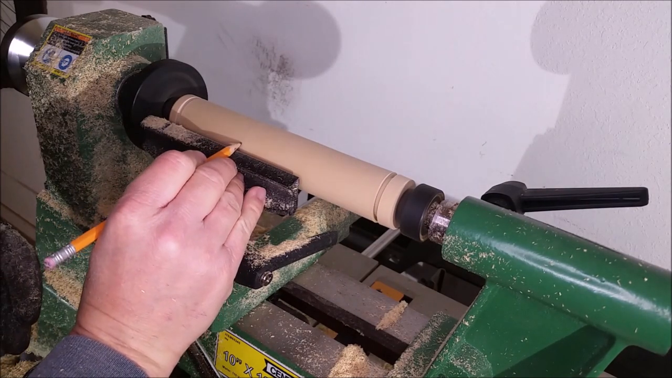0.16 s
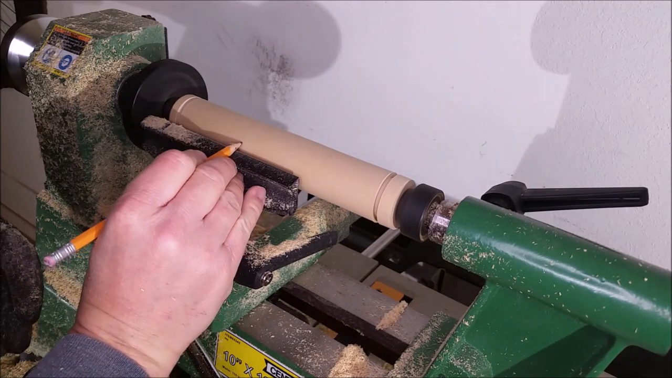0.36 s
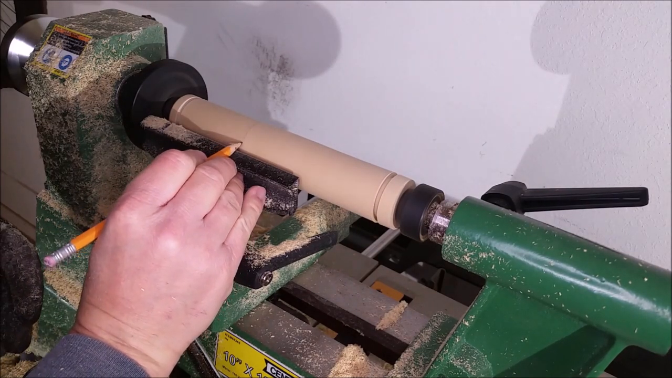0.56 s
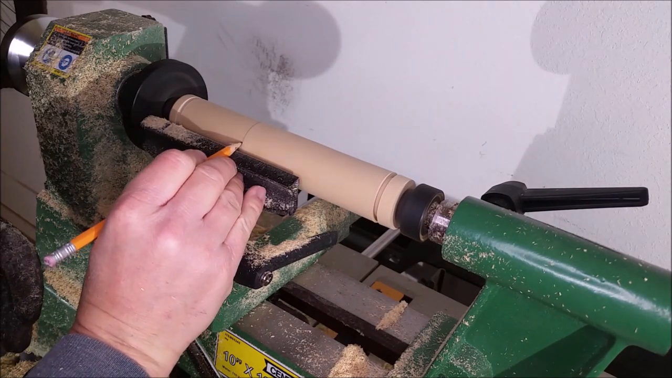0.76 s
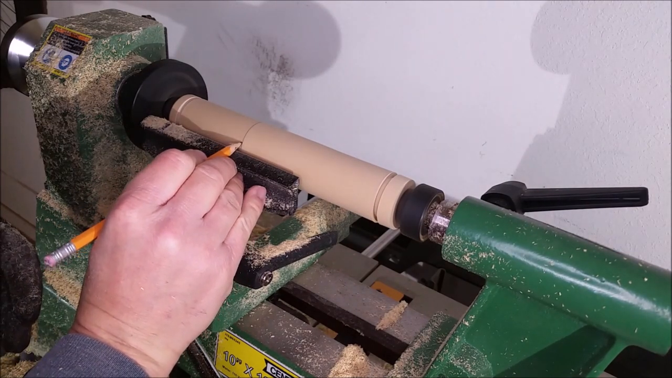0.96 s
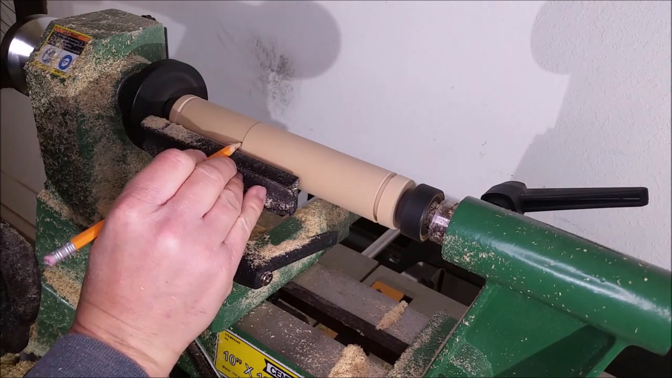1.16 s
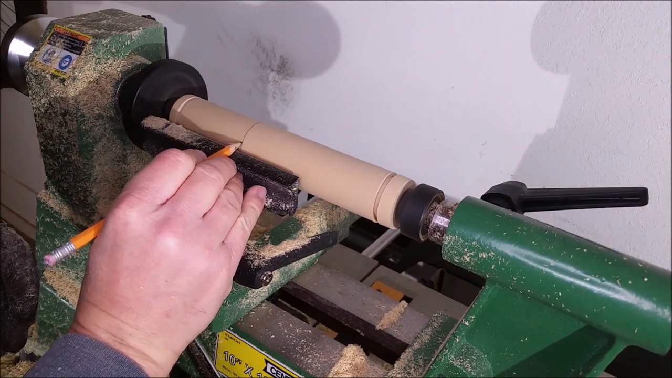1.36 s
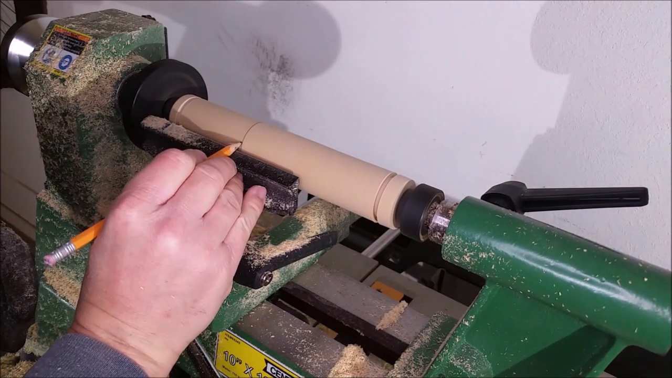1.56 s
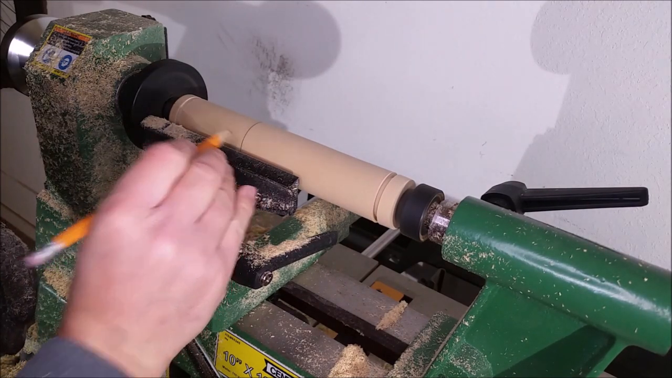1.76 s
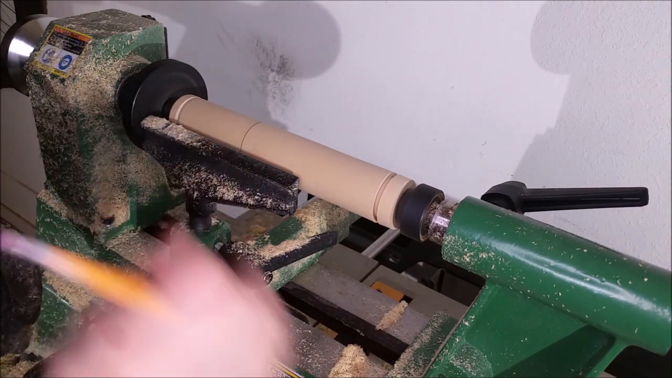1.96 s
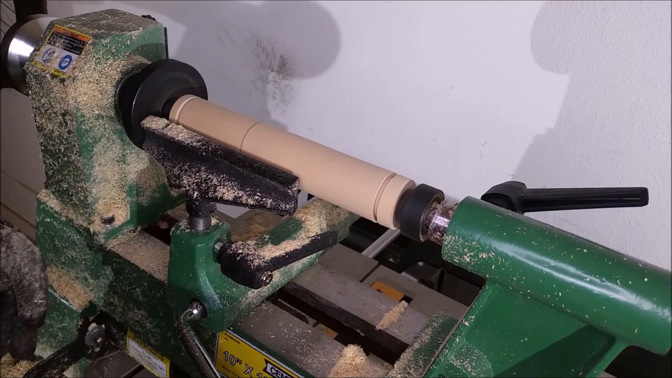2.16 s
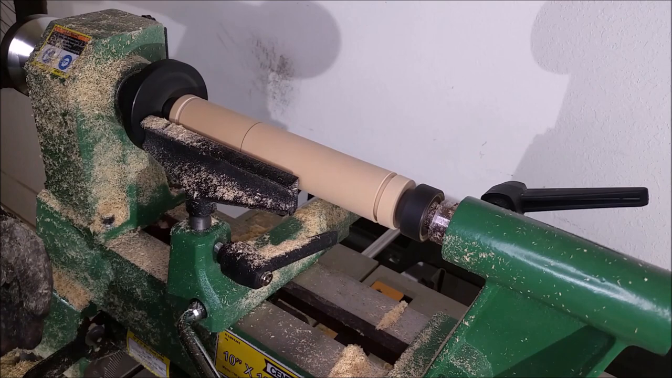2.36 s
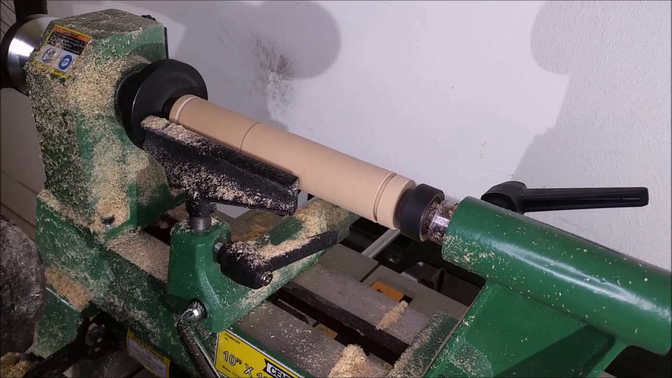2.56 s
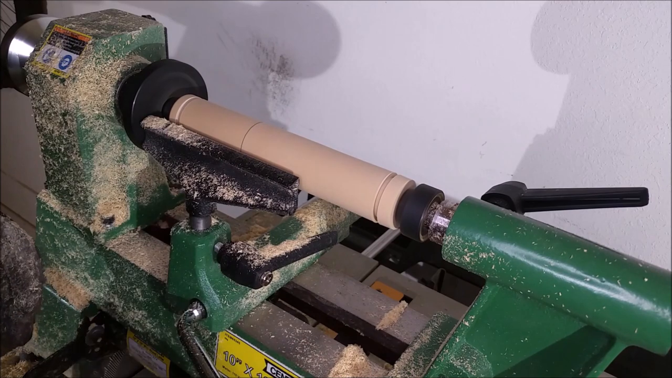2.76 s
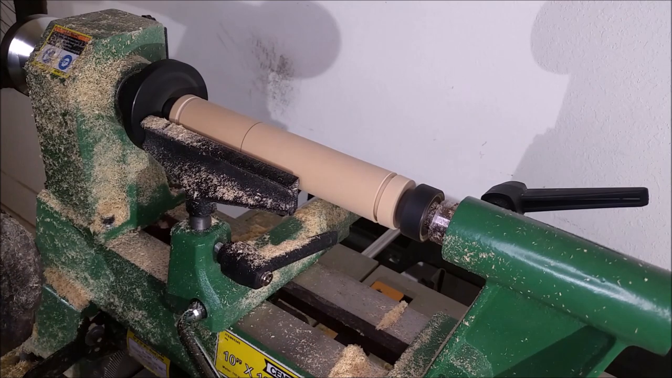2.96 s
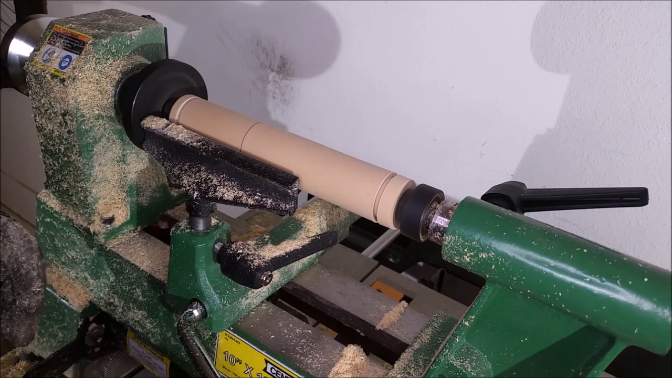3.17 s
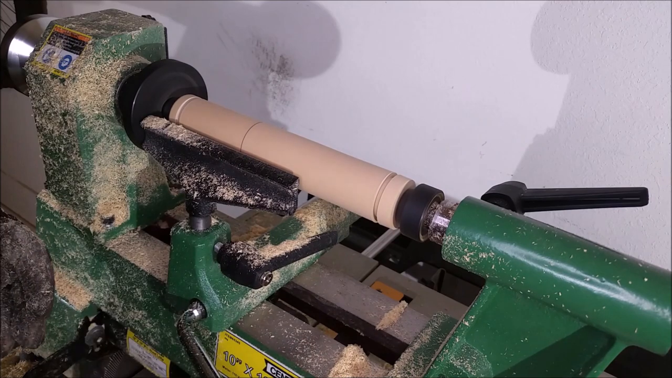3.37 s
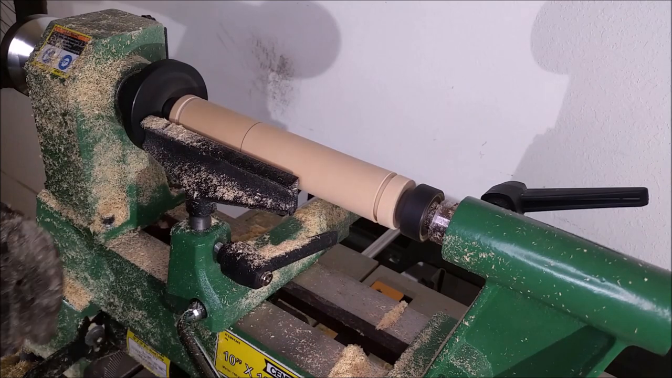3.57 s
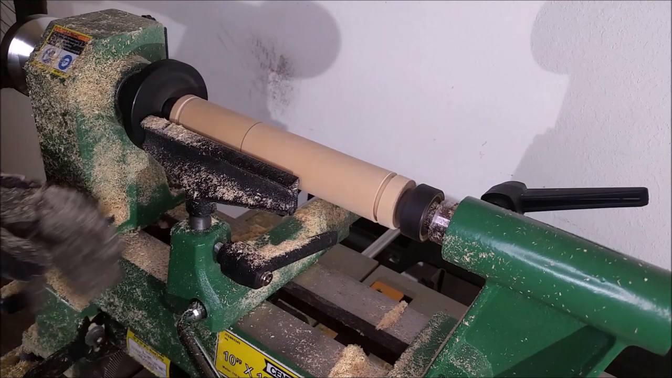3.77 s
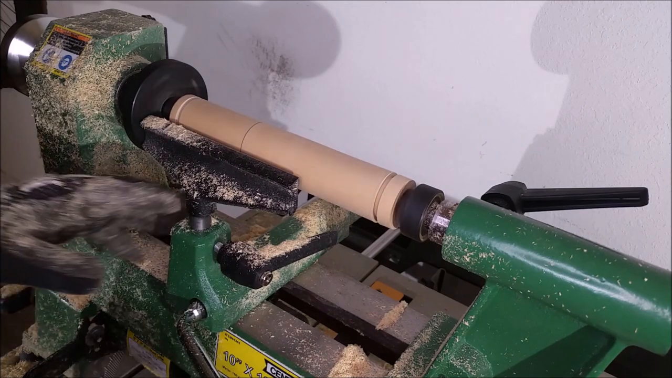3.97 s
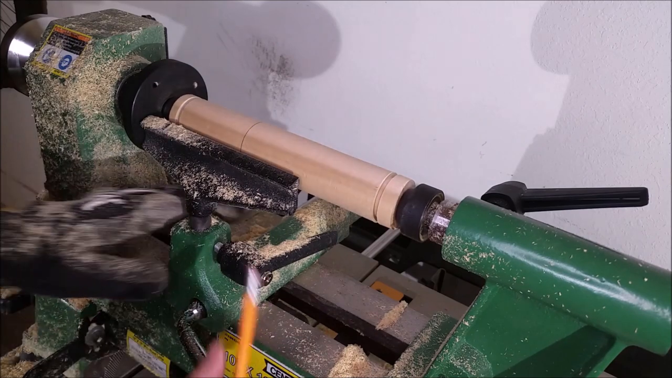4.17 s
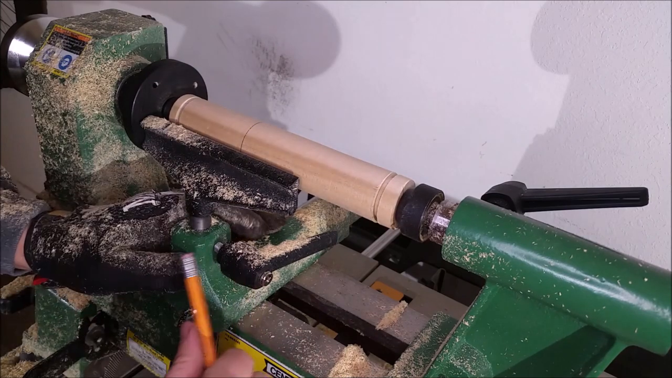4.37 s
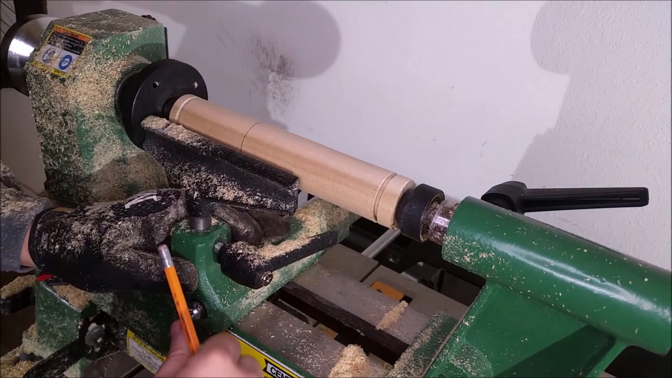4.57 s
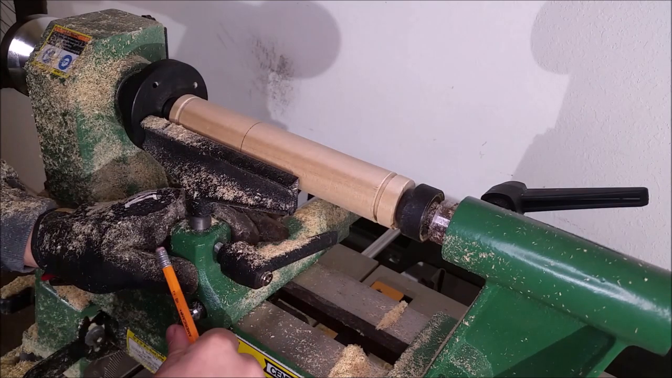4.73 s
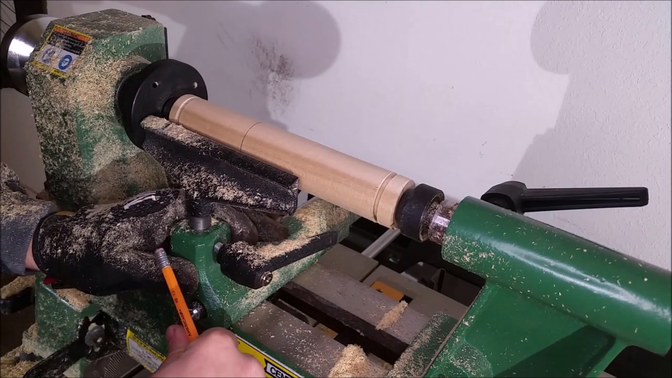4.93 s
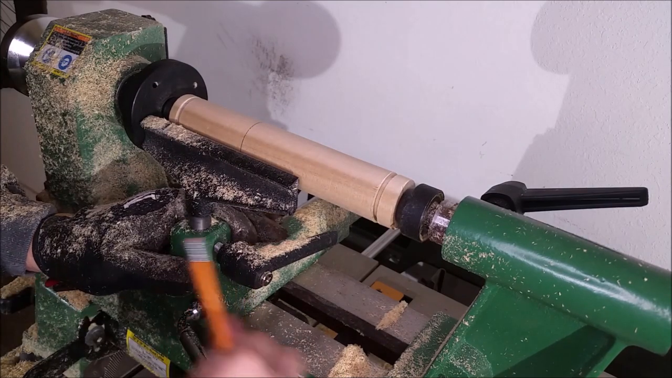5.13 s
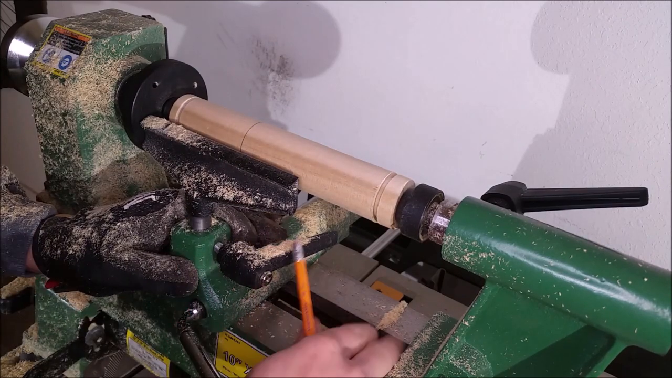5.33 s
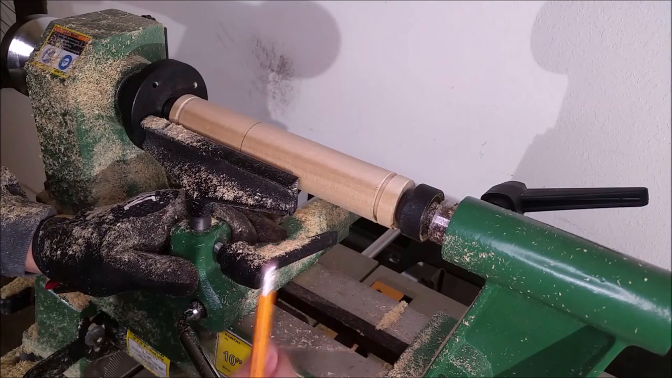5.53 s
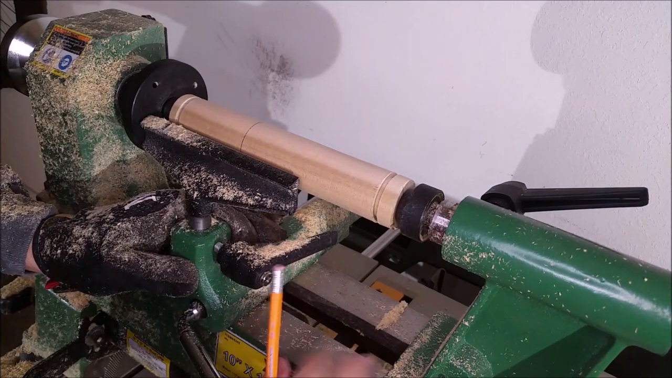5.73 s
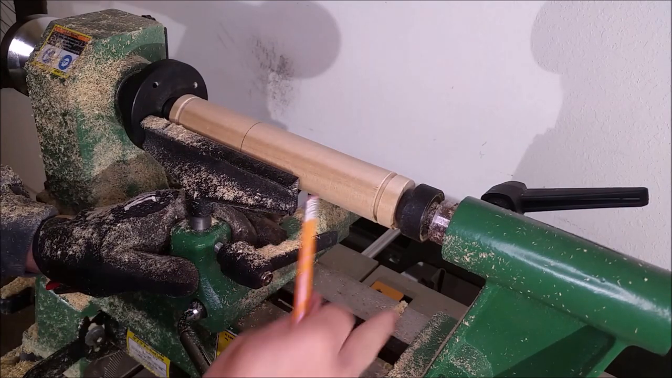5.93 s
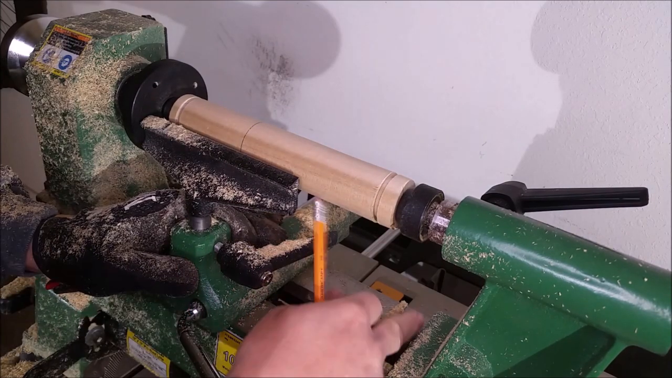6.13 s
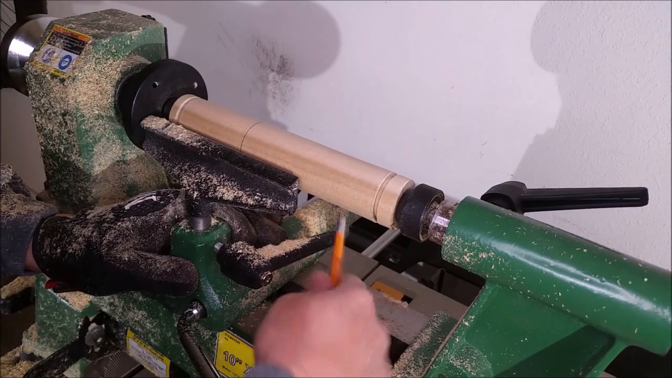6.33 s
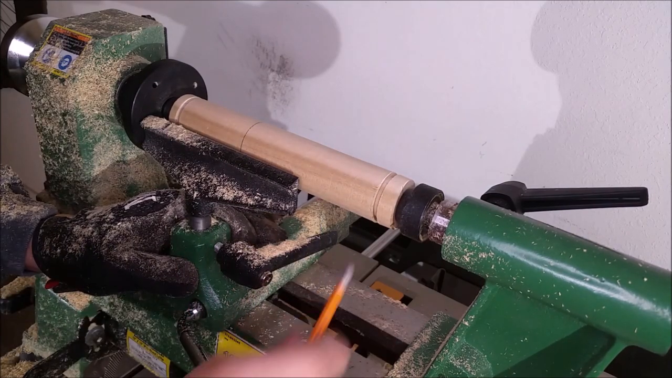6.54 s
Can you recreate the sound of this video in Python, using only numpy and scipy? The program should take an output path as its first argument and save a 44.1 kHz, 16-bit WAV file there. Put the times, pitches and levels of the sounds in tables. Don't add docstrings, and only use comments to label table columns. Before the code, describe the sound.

A small lathe hums steadily while a pencil scratches and squeals on spinning wood, then the switch snaps and it coasts down to soft glove rustles and knocks.

```python
import sys
import numpy as np
from scipy import signal
from scipy.fft import rfft, irfft, next_fast_len
from scipy.io import wavfile
from scipy.ndimage import uniform_filter1d, map_coordinates

SR = 44100
rng = np.random.default_rng(int(sys.argv[2]) if len(sys.argv) > 2 else 0)


def transcribe(signal):
    frames = np.atleast_2d(signal).T
    limited = np.clip(frames, -1, 1)
    pcm = np.round(limited * 32767).astype(np.int16)
    wavfile.write(sys.argv[1], SR, pcm)


def decibels_to_gain(level_db):
    exponent = np.asarray(level_db, float) / 20
    return 10 ** exponent


N = 291060

TURN_HZ = 39.66
OFF_S, DRAG_S, STOP_S = 2.9474, 2.971, 4.282


def clock():
    return np.arange(N) / SR


def unit(x):
    return x / np.sqrt(np.mean(x ** 2) + 1e-20)


def along(points, hz):
    f, v = np.transpose(points)
    return np.interp(np.log(hz + 1), np.log(f + 1), v)


def wobble(rate_hz):
    steps = np.arange(0, N * rate_hz / SR + 1, 1 / 8)
    smooth = map_coordinates(rng.standard_normal(int(steps[-1]) + 4), [steps])
    return np.interp(clock() * rate_hz, steps, smooth)


def filtered(x, response):
    m = next_fast_len(N + SR // 2)
    return irfft(rfft(x, m) * response(np.fft.rfftfreq(m, 1 / SR)), m)[..., :N]


def coloured(x, spectrum):
    return unit(filtered(x, lambda hz: decibels_to_gain(along(spectrum, hz))))


def resonant(peaks, hz):
    total = 0
    for k, (centre, width, db) in enumerate(peaks):
        mode = 1j * hz * width / (centre * centre - hz * hz + 1j * hz * width)
        total = total + (-1) ** k * decibels_to_gain(db) * mode
    return total


def tones(lines, drift, swell_db):
    total = 0
    for hz, db in lines:
        size = np.sqrt(2) * decibels_to_gain(db + swell_db * wobble(8.69))
        phase = 2 * np.pi * hz * clock() + drift * wobble(7) + 7 * rng.random()
        total = total + size * np.sin(phase)
    return total


def swells(rows, rise=1):
    s, db, width = np.transpose(rows)[:, :, None]
    t = clock()[::32]
    offset = np.abs((t - s) / np.where(t < s, rise * width, width))
    return np.interp(clock(), t, decibels_to_gain(db - 10 * offset ** 1.4).sum(axis=0))


def surface(memory, bumps_db, fresh):
    turn = clock() * TURN_HZ
    shape = (int(turn[-1]) + 2, round(SR / TURN_HZ))

    def wear():
        return uniform_filter1d(rng.standard_normal(shape), max(round(memory), 1), axis=0)

    bumps = unit(uniform_filter1d(wear(), size=28, axis=1, mode="wrap"))
    grain = (unit(wear()) + fresh * rng.standard_normal(shape)) * decibels_to_gain(bumps_db * bumps)
    return grain[turn.astype(int), (turn % 1 * shape[1]).astype(int)]


def walls(x, t60_s):
    t = np.arange(SR // 2) / SR
    tail = rng.standard_normal(SR // 2) * decibels_to_gain(-60 * t / t60_s)
    return signal.fftconvolve(x, tail / np.linalg.norm(tail))[:N]


# [f/Hz, level/dB per Hz]
RUMBLE = [(12, -53.5), (20, -6.5), (70, 0.5), (128, -8.5), (145, -7), (265, -16), (367, -19.5), (414, -35),
          (608, -25), (686, -27), (759, -14), (807, -34.5), (2500, -43), (3250, -69.5), (5500, -120)]
MIC_HISS = [(880, -42), (1500, -12), (1790, -1.5), (2190, -6.5), (5280, -10.5), (9370, -16), (14800, -7),
            (16000, -17)]
# [f/Hz, level/dB rms]
APPLIANCES = [(59.2, -62.5), (80.7, -61.5), (118.4, -62), (597.5, -75), (624.5, -73), (742.9, -57),
              (1217, -80.5)]


def workshop():
    rumble = coloured(rng.standard_normal(N), RUMBLE)
    hiss = coloured(rng.standard_normal(N), MIC_HISS)
    return decibels_to_gain(-54.5) * rumble + decibels_to_gain(-68.5) * hiss + tones(APPLIANCES, drift=.2, swell_db=0.9)


# [f/Hz, level/dB per Hz]
FABRIC = [(900, -42.5), (1800, -8.5), (3000, -5.5), (4500, -5.5), (6000, -6), (7500, -11.5), (9100, -12),
          (12400, -3.5), (14500, -9.5), (16000, -8)]
SCUFF_NOISE = [(88, -31.5), (150, -2.5), (568, -7.5), (753, -12.5), (792, -8.5), (1050, -11), (1240, -9.5),
               (8000, -28), (10400, -75.5), (17600, -120)]
# [t/s, level/dB, half-width/s]
RUSTLES = [(2.22, -56, .12), (2.45, -55, .1), (2.7, -55, .15), (3.2, -60.5, .3), (3.71, -67.5, .06),
           (3.96, -68.5, .15), (4.2, -67.5, .04), (4.42, -61, .07), (4.66, -64.5, .15), (5.565, -56, 0.04),
           (5.77, -59.5, 0.0126), (5.84, -53.5, 0.041), (5.975, -67.5, .015), (6.03, -64, 0.011),
           (6.07, -56.5, 0.0093), (6.237, -61.5, .012), (6.15, -69, .2), (6.33, -63, 0.05),
           (6.42, -48, 0.038), (6.533, -52.5, .02), (6.59, -63.5, .04)]
SCUFFS = [(5.985, -71, 0.025), (4.0, -58, 0.406), (4.63, -56.5, 0.23), (5.25, -67.5, 0.57),
          (5.57, -66, 0.098), (5.85, -67, 0.09), (6.05, -56, 0.027), (6.2, -52, 0.23), (6.5, -50, 0.11)]


def gloves():
    steel = [(1100, 75, -5.5), (1920, 150, -6.5), (2338, 130, 9.0),  # f/Hz, width/Hz, level/dB
             (2970, 140, -6.0), (3607, 200, 8.0), (4613, 150, -0.5)]
    fibres = rng.standard_normal(N) * decibels_to_gain(2.2 * wobble(400))
    rustle = coloured(fibres, FABRIC)
    scuff = coloured(rng.standard_normal(N) * decibels_to_gain(0.77 * wobble(40)), SCUFF_NOISE)
    scuff = unit(filtered(scuff, lambda hz: 5.4 + resonant(steel, hz)))
    return swells(RUSTLES) * decibels_to_gain(3.5) * rustle + swells(SCUFFS) * decibels_to_gain(1.5) * scuff


# [f/Hz, level/dB, t60/s]
REST = [(494, -15.5, .2), (657, 1, .14), (689, -2, .17), (1090, -12, .09), (1163, -14, .08),
        (1840, -21, .15)]
# contacts [t/s, peak/dB, tool rest ring/dB, crack/dB]; modes struck [f/Hz, level/dB, t60/s]; band top/Hz
SWITCH = [(2.9474, -7.5, -14, 0)], [(1300, -5, .008), (3510, 2, 0.013), (4600, -4.5, .008),
          (6100, -5, 0.011), (13640, -3, .0073)], 24000
LEVER = [(4.4968, -43, -3, -24), (4.518, -41.5, -11, -24), (4.567, -53, -20, -33)], [(1430, -2.5, 0.18),
         (1770, 1, .12), (3300, -8.5, 0.079)], 4000
FERRULE = [(5.9749, -26.5, -41, -9.5)], [(3500, -9, .0015), (7000, -3, .0015)], 14000
CLAMP = [(6.028, -25.5, -31, -18), (6.042, -32.5, -14, -15)], [(356, -2.5, 0.015), (800, -1, 0.01),
         (2208, -9, 0.028), (3490, -12, 0.1), (4330, -7.5, 0.054)], 4500
POST = ([(6.0631, -26.5, -9, -8.5), (6.0685, -40, 15, -20), (6.46, -40.5, -23, -30)], [(1140, 0.5, 0.041),
        (3000, 0.5, 0.017), (1840, -2.5, 0.027)], 9300)
NUDGE = [(6.229, -39, -2, -25), (6.242, -34, -6, -22), (6.252, -48, 3, -27)], [(1150, 4, 0.028),
         (3560, -19, 0.27)], 5000
TAP = [(6.4247, -29, -31, -8), (6.4315, -33, -31, -20)], [(3050, 0, .022)], 9000


def struck(noise, hz, level_db, t60_s, t):
    clack = decibels_to_gain(-2.0) * (1 - 7 * hz * t) * np.exp(-7 * hz * t)
    band = signal.butter(2, [.92 * hz, 1.09 * hz], "band", fs=SR, output="sos")
    rough = unit(signal.sosfilt(band, noise))
    ring = 0.49 * np.sin(2 * np.pi * hz * t) + 0.61 * rough
    return decibels_to_gain(level_db) * (clack + decibels_to_gain(-60 * t / t60_s) * ring)


def rest_ring(jitter, t):
    total = 0
    for k, (hz, db, t60_s) in enumerate(REST):
        decay = decibels_to_gain(db + 1.2 * jitter[k] - 60 * t / t60_s)
        total = total + decay * (-1) ** k * np.sin(2 * np.pi * hz * t)
    return (1 - np.exp(-t / 0.0027)) ** 3 * total


def knocks():
    out, t = np.zeros(N + SR), np.arange(SR // 3) / SR
    for contacts, modes, top_hz in (SWITCH, LEVER, FERRULE, CLAMP, POST, NUDGE, TAP):
        lowpass = signal.butter(2, min(top_hz, .45 * SR), fs=SR, output="sos")
        for s, db, rest_db, crack_db in contacts:
            noise = rng.standard_normal((3, len(t)))
            sound = decibels_to_gain(crack_db - 60 * t / 0.0073) * (noise[0] - 0.19 * np.roll(noise[0], 2))
            for hz, level_db, t60_s in modes:
                sound = sound + struck(noise[1], hz, level_db, t60_s, t)
            sound = signal.sosfilt(lowpass, sound)
            hit = decibels_to_gain(db) * (sound + decibels_to_gain(rest_db) * rest_ring(noise[2], t))
            out[round(s * SR):][:len(t)] += hit
    return out[:N]


# [t/s, level/dB, time to rise 10 dB/s, t60/s, f/Hz]
SQUEAKS = [(.1, -40, .07, .7, 4500), (.2, -44, .03, .3, 4490), (2.24, -52, .1, .6, 6280),
           (2.28, -48, .08, .4, 4470)]


def squeak(hiss):
    t, total = clock(), 0
    for s, db, rise_s, t60_s, hz in SQUEAKS:
        gain = decibels_to_gain(db + np.where(t < s, 10 * (t - s) / rise_s, -60 * (t - s) / t60_s))
        total = total + gain * (tones([(hz, 1.5)], drift=3.6, swell_db=5.0) + decibels_to_gain(-0.5) * hiss)
    return total


# [f/Hz, level/dB per Hz]
DRAG = [(35, -55.5), (60, -26), (139, -7.5), (172, -16), (408, -6.5), (666, -8.5), (1380, -6.5),
        (1580, -5.5), (2520, -13.5), (4030, -12.5), (16000, -25.5)]
# [f/Hz, width/Hz, level/dB]
BED = [(272, 6.7, -22), (420, 22, -3.5), (678.6, 38, 4.5), (1070, 110, 6), (1270, 60, -8.5),
       (1588, 36, 0.5), (1843, 140, -7.5), (2270, 45, 4), (2750, 13, -15), (2930, 65, 3.5)]
# [f/Hz, level/dB, t60/s]
GRAB = [(600, -18, 0.95), (1808, -19, 1.62), (4200, -16.5, 0.62), (9946, -21.5, .45)]
# [t/s,
# level/dB, half-width/s]
UPPER_SWEEPS = [(3.0, -35, .08), (3.15, -28.5, 0.11), (3.4, -32.5, 0.15), (3.55, -39, 0.081),
                (3.68, -37.5, 0.17), (3.86, -43, 0.082), (4.0, -58, 0.064)]
LOWER_SWEEPS = [(.2, -43, 0.21), (2.3, -37, 0.12), (3.05, -43, 0.062), (3.17, -48.5, 0.11),
                (3.49, -49, 0.098), (3.77, -51, 0.11), (3.96, -45.5, 0.085), (4.19, -57.5, .04),
                (4.28, -61, .04)]


def coasting():
    rub = rng.standard_normal(N) * decibels_to_gain(.7 * wobble(35) + .9 * wobble(150))
    rub = unit(filtered(rub, lambda hz: decibels_to_gain(along(DRAG, hz)) * (0.41 + resonant(BED, hz))))
    hz, t, z = signal.stft(rub, SR, nperseg=128)
    hz, since = hz[:, None], t - DRAG_S
    speed = np.clip(1 - since / (STOP_S - DRAG_S), 1e-4, 1)
    over = hz / (3890 * speed ** 1.4)
    shelf = decibels_to_gain(2 * -11.5) / (1 + over ** 2)
    steady = decibels_to_gain(-31.5) * speed ** 0.41 * np.sqrt(1 / (1 + over ** 5.5) + shelf)
    grab_db, t60_s = (along(np.array(GRAB)[:, [0, k]], hz) for k in (1, 2))
    grab = decibels_to_gain(grab_db - 60 * np.abs(since) / t60_s)
    gain = np.clip(since / 0.0064, 0, 1) * np.hypot(steady, grab)
    rub = signal.istft(z * gain, SR, nperseg=128)[1][:N]
    upper_tones = tones([(442, -14.0), (660, -1.0), (682, -8.0)], drift=2.5, swell_db=-2.5)
    upper = swells(UPPER_SWEEPS, rise=0.22) * upper_tones
    lower = swells(LOWER_SWEEPS, rise=.8) * tones([(256, 0)], drift=.6, swell_db=.4)
    return rub + (clock() > OFF_S) * upper + lower


# [t/s, level/dB]
PRESSURE = [(.455, -34), (.48, 0), (.525, -5), (.6, -2.5), (.75, -.5), (1.6, 0), (1.765, -2), (1.8, 0),
            (1.815, -16), (1.9, -30)]


def pressure():
    s, db = np.transpose(PRESSURE)
    return decibels_to_gain(np.interp(clock(), s, db, -120, -120))


def vibrating(full_db, short_db, recover_s, linger_s):
    dip_s = 0.62
    held = filtered(pressure(), lambda hz: 1 / (1 + 2j * np.pi * hz * linger_s))
    return held * decibels_to_gain(full_db - short_db * np.exp(-np.abs((clock() - dip_s) / recover_s) ** 0.56))


# [f/Hz, level/dB per Hz]
SCRATCH = [(2000, -30), (2800, -2), (3900, -24), (5200, -18.5), (7000, -21.5), (8500, -16.5), (9500, -16),
           (10700, -8.5), (11150, -17), (12200, -1.5), (13600, -10.5), (14100, -11.5), (14400, -23),
           (15200, -21.5), (15600, -17.5), (16000, -20.5)]
# [f/Hz, width/Hz, level/dB]
SHAFT = [(3425, 31, -5), (4230, 120, -10.5), (4600, 40, -7.5), (5570, 19, -11.5), (5600, 58, -12),
         (6230, 25, -4.5), (8540, 24, -11.5), (10960, 48, -5.5), (10720, 120, -16), (11200, 43, -13),
         (11900, 30, -21.5), (12650, 37, -7), (13750, 150, -13.5), (15520, 90, -13)]
BLANK = [(603, 30, 1), (1150, 200, -6), (1452, 72, -4), (1697, 350, 1.5), (2040, 110, 4), (2080, 89, 1),
         (2344, 60, -1.5), (2793, 46, -1.5), (3200, 240, -9.5)]
# [f/Hz, level/dB rms]
SINGING = [(1071, -31.5), (1109, -30.5), (1233, -38.5), (1276, -40), (1357, -46), (1507, -39),
           (1547, -42.5), (1626, -35.5), (1666, -40), (1705.4, -31), (1745, -33.5), (1784.7, -39.5),
           (1903.7, -25), (1943.3, -29.5), (2022.7, -34.5), (2045, -34.5), (2062.3, -36.5), (2126, -39.5),
           (2229, -36.5), (2299, -41.5), (2379, -38), (2627, -47.5), (2767, -30.5), (2859, -37.5)]
SQUEALS = [(4107, -43), (5362, -60), (10912, -60), (11337, -58), (11499, -45.5), (11892, -48),
           (12252, -41.5)]
WHISTLE = [(4630, -38.5), (4657, -45), (6245, -40.5), (6262, -47)]
# [f/Hz, level/dB rms, place in turn 0-1]
CHIRPS = [(1824.4, -32, .48), (4710, -35, .48), (12210, -42, .19)]


def high_spot(place):
    angle = 2 * np.pi * (TURN_HZ * clock() - place) + .12 * wobble(6)
    return unit(np.exp(2.6 * np.cos(angle)))


def pencil():
    scratch = coloured(surface(memory=14, bumps_db=3.5, fresh=1.0), SCRATCH)
    ring = unit(filtered(surface(memory=14, bumps_db=4.5, fresh=.3), lambda hz: resonant(SHAFT, hz)))
    runout = 1 + .9 * np.sin(2 * np.pi * TURN_HZ * clock() + 0.25 * wobble(2.7))
    squeal = decibels_to_gain(27.5) * runout * tones(SQUEALS, drift=1.0, swell_db=0.5)
    lead = tones(WHISTLE, drift=1.6, swell_db=1.9)
    for hz, db, place in CHIRPS:
        lead = lead + high_spot(place) * tones([(hz, db)], drift=.7, swell_db=.6)
    hum = surface(memory=34, bumps_db=3.0, fresh=0.76)
    hum = unit(filtered(hum, lambda hz: np.abs(resonant(BLANK, hz)) ** 1.2))
    song = decibels_to_gain(17.5) * tones(SINGING, drift=.55, swell_db=.6)
    ring_gain = vibrating(full_db=-27, short_db=14, recover_s=0.039, linger_s=.005)
    lead_gain = vibrating(full_db=1, short_db=11.5, recover_s=0.15, linger_s=.025)
    hum_gain = vibrating(full_db=-21, short_db=21.5, recover_s=0.03, linger_s=0.08)
    return (decibels_to_gain(-28.5) * pressure() * scratch
            + ring_gain * (decibels_to_gain(-3) * ring + pressure() * squeal)
            + lead_gain * lead
            + hum_gain * (decibels_to_gain(0.5) * hum + song))


# [f/Hz, level/dB rms]
ORDERS = [(209.9, -59), (253.0, -49), (328.4, -46.5), (425.3, -41.5), (479.1, -45), (640.6, -37.5),
          (656.8, -40), (678.3, -39.5), (759.0, -41.5), (850.6, -33), (870, -42.5), (969, -47.5),
          (995.9, -30.5), (1026, -46), (1066, -40.5), (1114, -38.5), (1157, -47), (1238, -39),
          (1276, -43.5), (1357, -37.5), (1491, -40), (1626, -42), (1707, -39), (1771, -41), (1911, -38),
          (2056, -50.5), (2132, -38.5), (2213, -52), (2336, -39), (2993, -42.5), (3085, -41.5), (3225, -49),
          (3488, -53)]
MAINS = [(119.8, -42), (144.5, -43)]
# [f/Hz, level/dB per Hz]
WHIRR = [(15, -62), (25, -17.5), (86, -18.5), (128, -12), (291, -15), (431, -11), (559, -10.5), (651, -11),
         (921, -8), (1000, -4.5), (1170, -6.5), (3040, -12), (4500, -32), (5850, -49), (9900, -120)]
BEARING = [(2060, -27.5), (3500, 0.5), (3870, -5.5), (4630, -2), (5250, -11), (5600, -11.5), (5950, -13),
           (6300, -8), (6800, -19), (7900, -23.5), (10100, -26), (11600, -21), (13500, -27), (16000, -31.5)]
# [f/Hz, width/Hz, level/dB]
CASTING = [(272, 6.7, -21.5), (454, 34, -14), (685, 38, 2.5), (1081, 110, 5), (1315, 34, -8),
           (1700, 24, -2.5), (2218, 14, -10), (2700, 58, -25)]


def motor():
    t = clock() - OFF_S
    sag_db = -8 * np.clip(1 + t / 0.042, 0, 1)
    runout_db = -60 * t / 0.2
    running = decibels_to_gain(np.where(t < 0, sag_db, runout_db)) * (clock() < DRAG_S)
    noise = coloured(surface(memory=10, bumps_db=0.0, fresh=1.7), WHIRR)
    ringing = unit(filtered(noise, lambda hz: 0.761 + resonant(CASTING, hz)))
    hiss = coloured(surface(memory=6, bumps_db=0.0, fresh=1.8), BEARING)
    free_gain = decibels_to_gain(-39 + .5 * wobble(3.3))
    loaded_gain = vibrating(full_db=-33, short_db=4.0, recover_s=0.59, linger_s=0.024)
    orders = tones(ORDERS, drift=1.66, swell_db=2.0) + tones(MAINS, drift=.25, swell_db=.8)
    body = decibels_to_gain(-25.5) * ringing + decibels_to_gain(-0.5) * orders
    return running * (body + decibels_to_gain(2.0) * (free_gain + loaded_gain) * hiss), running * hiss


# [f/Hz, left lean -1..1, unrelated part/dB]
PAIR = [(350, 0, -62), (700, 0, -35.5), (1710, 0.02, -23.5), (2750, 0.072, -20.5), (4300, 0.33, -14),
        (4900, .33, -9), (5400, .22, -9), (6300, 0.47, -12), (7400, .01, -15), (8500, 0, -23.5),
        (10200, -.1, -10), (11200, -.05, -21), (12200, -.12, -15), (13300, -.05, -26), (15500, 0, -38.5)]


def scene():
    hits = knocks()
    lathe, hiss = motor()
    echo = filtered(walls(hits, t60_s=0.45), lambda hz: 1 / (1 + 1j * hz / 5000))
    mid = workshop() + gloves() + hits + decibels_to_gain(-4) * echo + squeak(hiss) + coasting() + pencil() + lathe
    lean, apart_db = (np.array(PAIR)[:, [0, k]] for k in (1, 2))
    side = filtered(mid, lambda hz: along(lean, hz))
    side = side + filtered(walls(mid, t60_s=.3), lambda hz: decibels_to_gain(along(apart_db, hz)))
    return np.array([mid + side, mid - side])


def band_limit(x):
    return signal.sosfilt(signal.butter(12, 16860, fs=SR, output="sos"), x)


def record(dry):
    top, band_hz = .98, 15760
    soft = dry / (1 + np.abs(dry / top).max(axis=0) ** 6) ** (1 / 6)
    return band_limit(filtered(soft, lambda hz: hz < band_hz))


dry = scene()
out = record(dry)
transcribe(out)
```